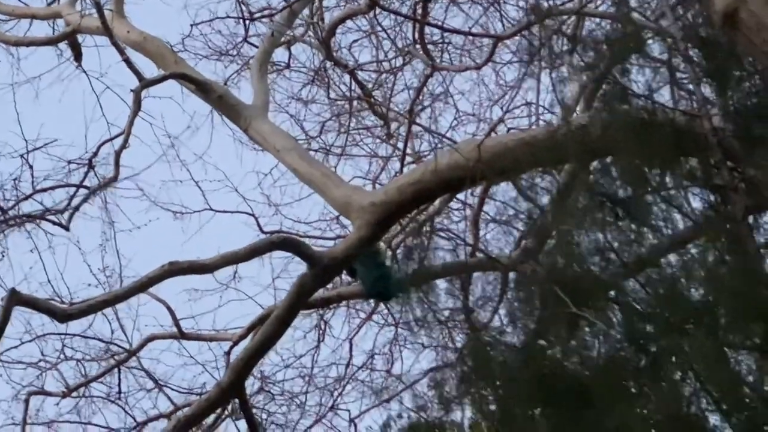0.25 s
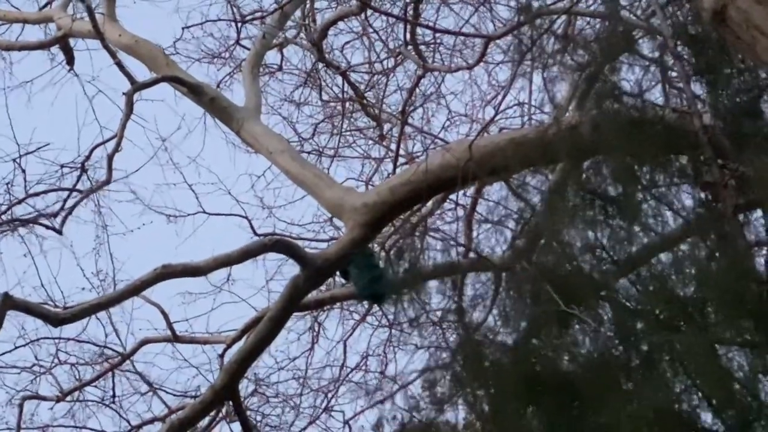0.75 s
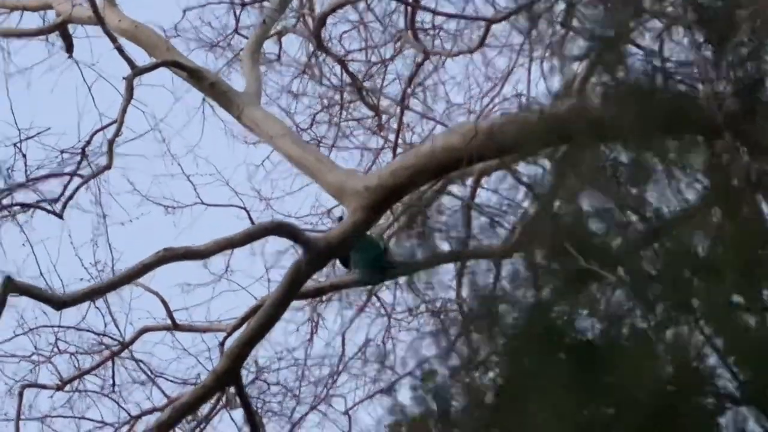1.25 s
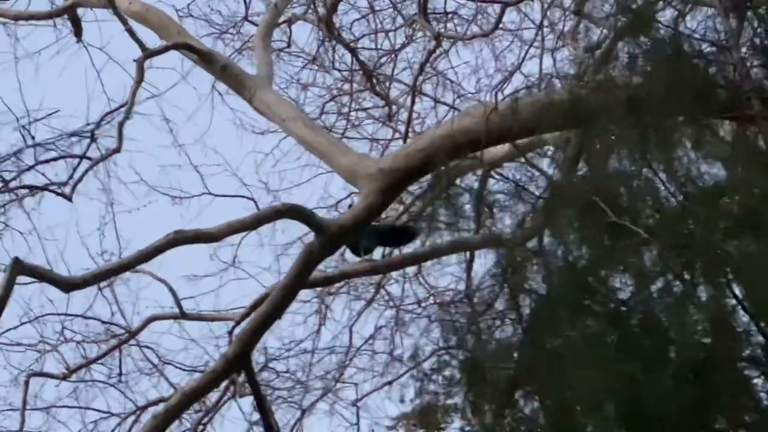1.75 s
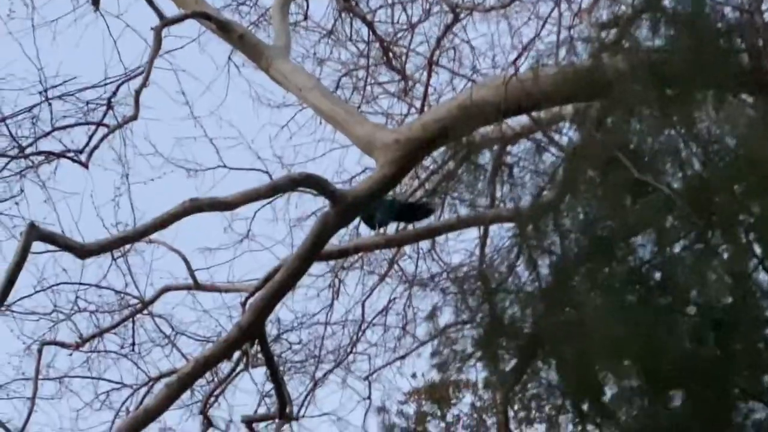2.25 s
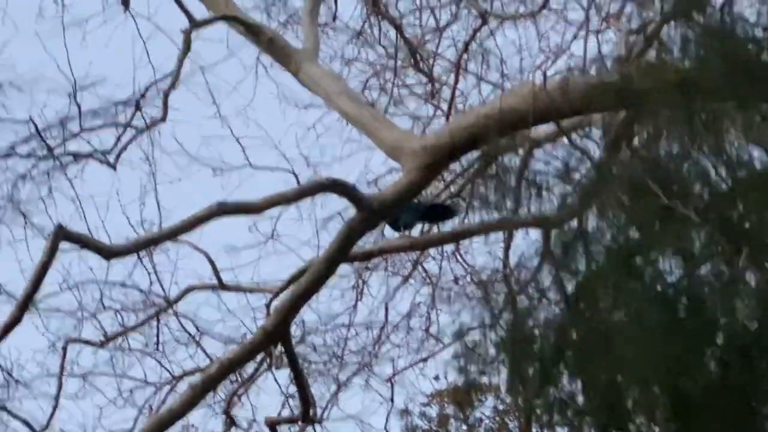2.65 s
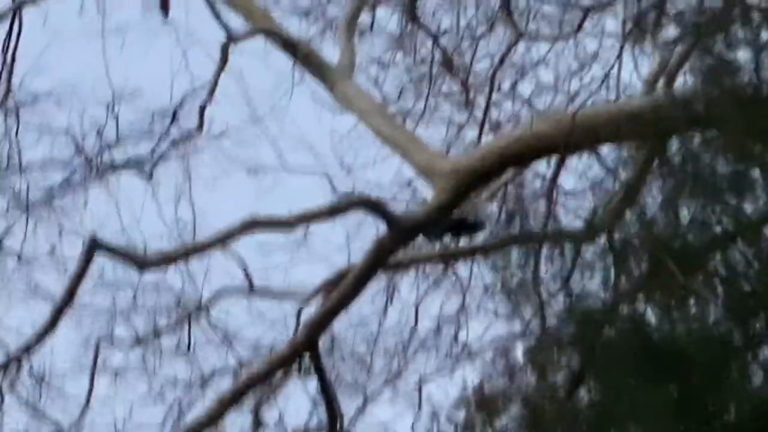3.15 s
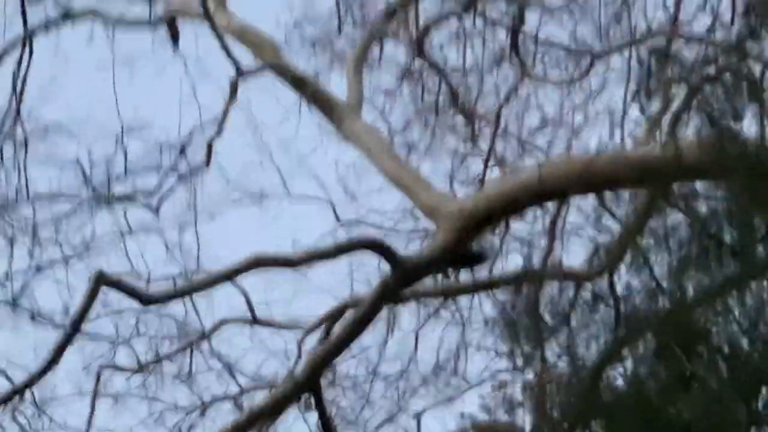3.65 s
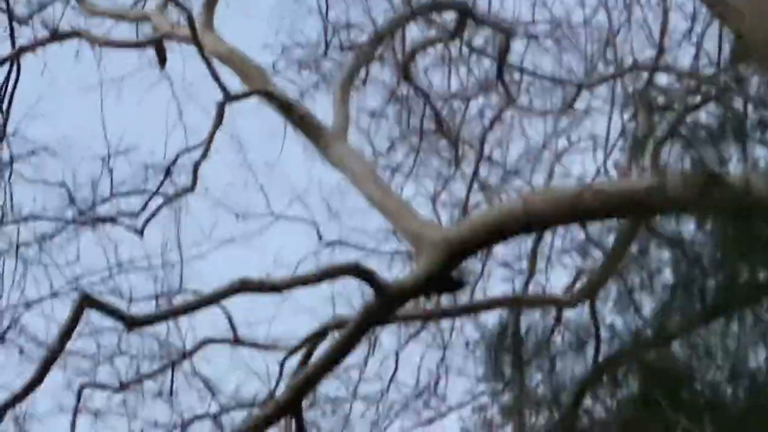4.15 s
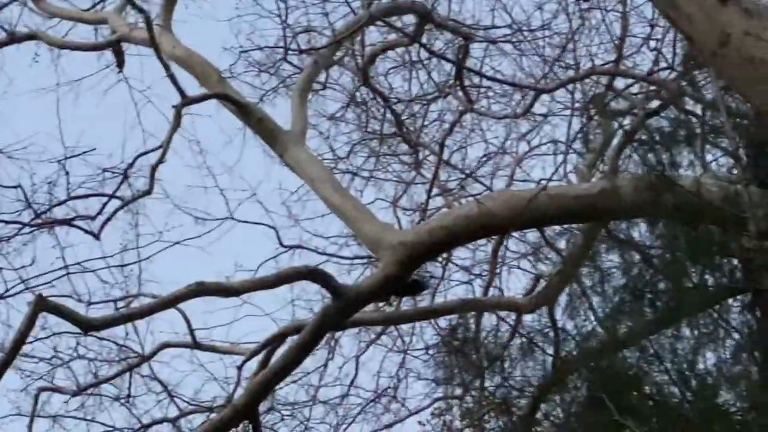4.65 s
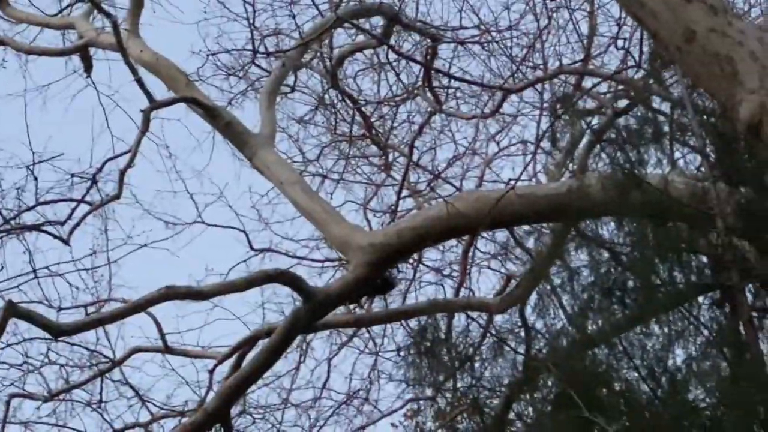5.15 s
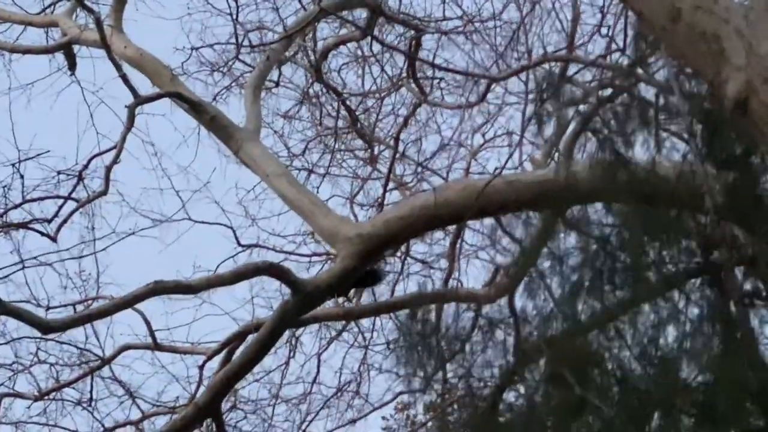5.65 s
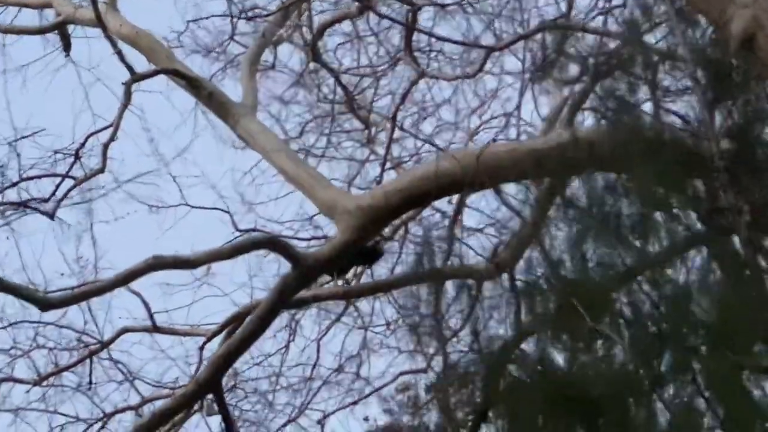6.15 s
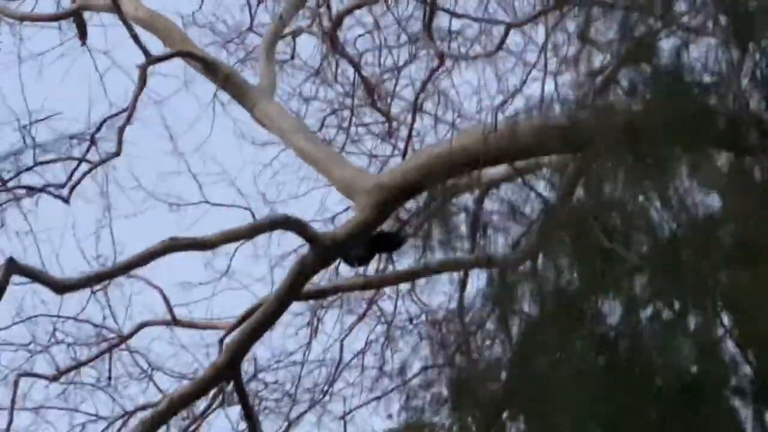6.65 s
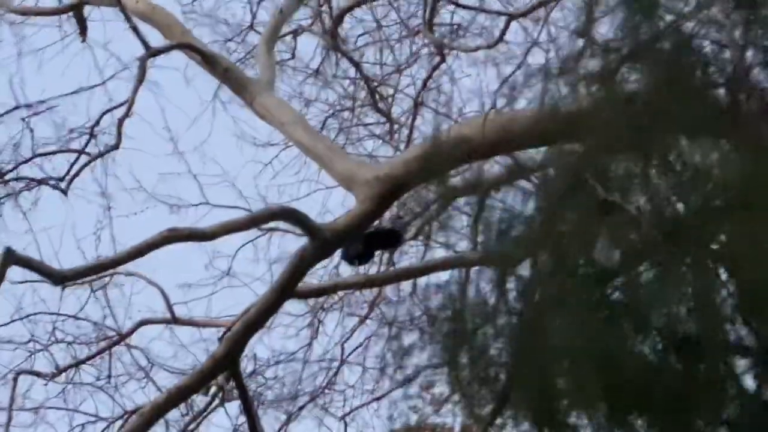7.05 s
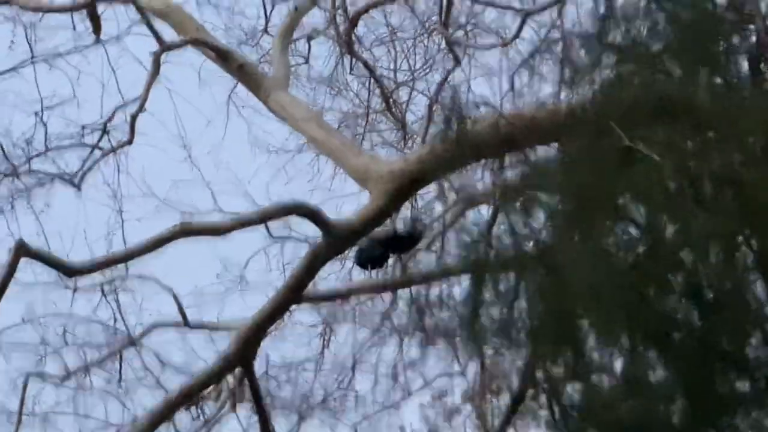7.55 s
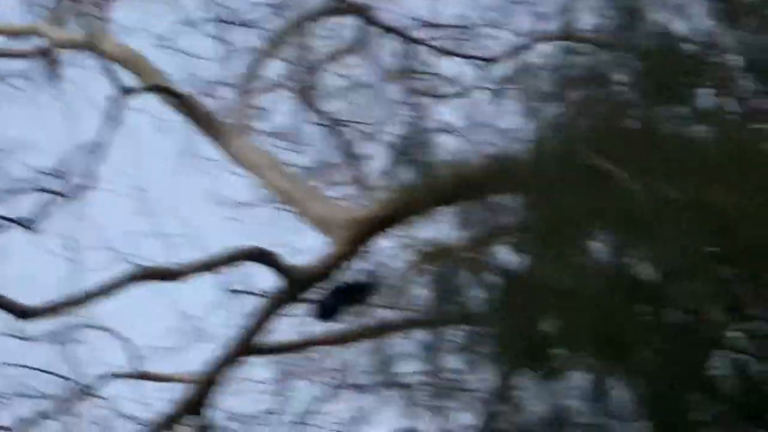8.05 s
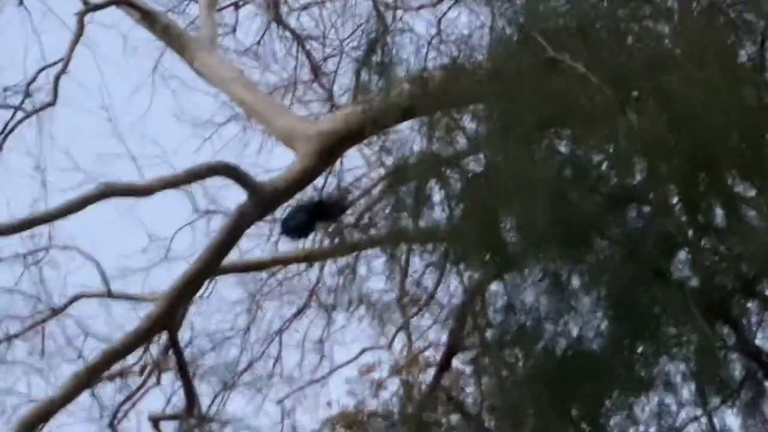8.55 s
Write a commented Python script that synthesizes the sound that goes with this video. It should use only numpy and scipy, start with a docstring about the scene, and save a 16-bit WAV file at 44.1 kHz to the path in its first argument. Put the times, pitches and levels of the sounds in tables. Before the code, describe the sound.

Outdoors among trees, a peacock calls loudly: after a quiet second, one long nasal wail sinks in pitch, then six shorter screams follow about a second apart, each breaking upward from a low note and drooping. The wood answers with brief hazy echoes. Far-off water and low rumble stay steady and faint. A hand-held camera picks up soft knocks, thumps and, near the end, rubbing and creaking.

```python
"""Peacock calling among trees

A peacock high in a tree gives one long falling wail, then six arching screams: harmonics of a gliding pitch,
shaped by a throat response. Decaying noise tails answer for the limbs, the crown and a wood's edge.
Water flows far off over a low outdoor rumble, both one coloured noise; a faint hiss precedes the wail.
Close by, fingers knock, rub and creak on a hand-held camera's case, which rings in a few damped modes."""
import sys
import numpy as np
from scipy import signal
from scipy.fft import rfft, irfft, next_fast_len
from scipy.io import wavfile
from scipy.ndimage import uniform_filter1d, map_coordinates

SR = 44100
rng = np.random.default_rng(int(sys.argv[2]) if len(sys.argv) > 2 else 0)


def dump_mix(stems):
    """Bounce the given channels to the path in sys.argv[1] as a 16-bit WAV at rate SR."""
    frames = np.atleast_2d(stems).T  # one column per channel
    limited = np.clip(frames, -1, 1)  # hard clip at full scale
    pcm = np.round(limited * 32767).astype(np.int16)
    wavfile.write(sys.argv[1], SR, pcm)


N = 388080

# Levels in the tables are relative: gains in the functions add to them.
# Distant water and rumble, spectral density: [f/Hz, level/dB per Hz]
HAZE_COLOUR = [(20, -49), (50, -2), (80, 1.5), (200, -10), (480, -8), (900, -14), (2000, -21.5),
               (2800, -28), (5700, -46.5), (7700, -59), (12000, -58.5), (15000, -67)]
# Course of the haze: [t/s, level/dB]
HAZE_LEVEL = [(0, -51), (4.498, -51), (8.8, -49)]
# Correlation of the left and right noise: [f/Hz, likeness/1]
LIKENESS = [(50, 1), (150, 0.82), (400, 0.41), (1200, 0.27), (4000, 0.96)]
# Knocks on the case: [t/s, tick level/dB, thump level/dB]
KNOCKS = [(0.898, -51, -45), (1.064, -53, -34), (1.154, -65, -32.5), (1.203, -51, -37), (1.326, -57, -33),
          (1.345, -55, -36.5), (2.016, -49.5, -46), (2.207, -52.5, -43), (2.241, -54.5, -33.5),
          (3.209, -43.5, -51), (3.606, -44, -47), (5.168, -57.5, -37), (5.621, -44.5, -50),
          (6.158, -56.5, -52), (7.463, -47, -36), (7.832, -61, -34.5), (8.181, -56, -39), (8.507, -52, -38)]
# Stick-slip creaks of the grip:
# [start t/s, end t/s, slip rate/Hz, tick level/dB, low ring level/dB, brightness/(dB per octave)]
CREAKS = [(3.156, 3.168, 230, -36.5, -50, -6.5), (8.534, 8.558, 62, -45.5, -37, 0.5),
          (8.605, 8.633, 133, -44, -31, -1), (8.638, 8.712, 59.7, -39.5, -35, 5),
          (8.757, 8.8, 108, -38, -60, 6)]
# Ringing modes of the case: [f/Hz, level/dB, t60/s]
CASE_MODES = [(623, -4.5, 0.035), (930, -1.5, 0.015), (1072, 6.5, 0.014), (2120, -0.5, 0.0063),
              (2810, -21, 0.0044)]
# Strokes of rubbing fingers: [t/s, length/s, level/dB]
RUBS = [(7, 0.12, -44), (7.241, 0.038, -47), (8.203, 0.091, -50.5), (8.53, 0.033, -53)]
# Spectral density of the rubbing: [f/Hz, level/dB per Hz]
RUB_COLOUR = [(40, -19), (120, -1), (550, -6.5), (900, -9), (1300, -16), (9000, -71)]
# Pitch of the wail: [t/s, f/Hz]
WAIL_PITCH = [(1.025, 644), (1.09, 712.6), (1.2, 718.3), (1.35, 705), (1.55, 678.4), (1.8, 649),
              (1.99, 600.5)]
# Strength of the wail: [t/s, second harmonic level/dB, overtone level/dB]
WAIL_STRENGTH = [(1.03, -50, -62), (1.088, -24.5, -45.5), (1.226, -24.5, -38), (1.336, -24.5, -44.5),
                 (1.558, -34.5, -51), (1.674, -30.5, -51.5), (1.93, -41.5, -58), (1.99, -51, -63)]
# Screams, each a low note that breaks upward into an arch:
# [start t/s, break t/s, crest t/s, end t/s, low note f/Hz, f after the break/Hz, crest f/Hz,
#  second harmonic level at the crest/dB, overtone level at the crest/dB]
SCREAMS = [(2.341, 2.524, 2.71, 3.04, 609.6, 727, 782.5, -26, -40),
           (3.381, 3.564, 3.67, 4.04, 649, 787.4, 810.7, -35.5, -34.5),
           (4.322, 4.532, 4.677, 4.93, 670, 774.4, 786, -37.5, -33.5),
           (5.221, 5.429, 5.55, 5.86, 697.6, 765, 787.4, -38.5, -33),
           (6.259, 6.459, 6.65, 6.94, 699, 765.3, 793.8, -34, -32.5),
           (7.38, 7.579, 7.78, 8.09, 694.6, 759, 797.2, -37.5, -33)]
# The fundamental grows as the pitch climbs: [f/Hz, level/dB]
FUNDAMENTAL = [(570, -49.5), (710, -38.5), (800, -33.5)]
# Throat response above the second harmonic, beak nearly closed: [f/Hz, level/dB]
NARROW_THROAT = [(1900, 12), (2075, -13.5), (2135, 9.5), (2850, -5.5), (3130, -13), (3550, -5),
                 (4300, -10.5), (6400, -14.5), (7800, -21.5), (9000, -25), (11000, -27), (12500, -34.5),
                 (15500, -50)]
# The same with the beak wide open: [f/Hz, level/dB]
OPEN_THROAT = [(1750, 7), (2050, 2.5), (2380, 3), (2600, -6.5), (2950, -1.5), (3250, -12.5), (3900, -16.5),
               (4700, -18.5), (7200, -24.5), (8600, -32.5), (11500, -34.5), (13200, -37), (15500, -49)]
# Decay time of the wood's answer: [f/Hz, t60/s]
WOOD_DECAY = [(600, 0.33), (2200, 0.84), (4000, 0.96), (15000, 0.062)]
# Phase difference of the bird's sound, left against right: [f/Hz, phase/rad]
PHASE_DIFFERENCE = [(1900, 0.5), (3000, 0.43), (5000, 0.58), (6000, -0.5), (7800, -0.1), (8200, 2),
                    (9000, 1.5), (13300, -2.5)]

TOP_HZ = 15800  # band limit
# light fidgeting: the firmest touch, and how much softer the lightest is
TOUCHES_PER_S = 2.5
TOUCH_TICK_DB, TOUCH_THUMP_DB, TOUCH_RANGE_DB = -55, -42, 12
# a scream starts this share of the way from the resting pitch to its low note
REST_HZ, START_SHARE = 538, .33
# the low note tops out and bends before the break; the leap ends after it
LOW_NOTE_S, SAG_S, LEAP_S = .075, 0.0348, .025
# a wider leap follows a sag of this share of the excess, a narrower one a rise
SMOOTH_LEAP_HZ, SAG_SHARE = 81.9, 0.432
# the pitch sinks gently for this share of the fall, then steeply
SHOULDER_SHARE, SHOULDER_HZ, FALL_HZ = .46, 41.93, 174.4
# all screams are alike where the voice is slack
SLACK_HZ, SLACK_SECOND_DB, SLACK_OVERTONE_DB = 649, -42, -38.5
# the overtones start this far down and catch up with this time constant
ATTACK_DB, ATTACK_S = 17.5, 0.039


def amp(db):
    """Logarithmic level: decibels to amplitude gain."""
    return 10 ** (np.asarray(db) / 20)


def unit(x):
    """Normalisation: scale to rms 1."""
    return x / np.sqrt(np.mean(x ** 2) + 1e-20)


def along(points, hz):
    """Logarithmic frequency axis: (f/Hz, value) points interpolated at hz."""
    f, v = np.transpose(points)
    return np.interp(np.log(hz + 1), np.log(f + 1), v)


def wobble(rate, size):
    """Band-limited randomness: a smooth random curve with rate knots a second."""
    knots = rng.standard_normal(int(size * rate / SR) + 4)
    return map_coordinates(knots, [np.arange(size) * rate / SR])


def glide(points, t):
    """Monotone cubic interpolation: a rounded curve through (t/s, value) points, level at each turn."""
    s, v = np.transpose(points)
    span = np.diff(s)
    step = np.diff(v) / span
    inner = 2 * np.maximum(step[:-1] * step[1:], 0) / (step[:-1] + step[1:] + 1e-9)
    slope = np.r_[step[0], inner, step[-1]]
    i = np.clip(np.searchsorted(s, t) - 1, 0, len(span) - 1)
    u = (t - s[i]) / span[i]
    bend = (1 - u) * (slope[i] - step[i]) - u * (slope[i + 1] - step[i])
    return v[i] + span[i] * u * (step[i] + (1 - u) * bend)


def filtered(x, response):
    """Linear filtering: the spectrum of x times a response of frequency."""
    m = next_fast_len(N + SR // 2)
    return irfft(rfft(x, m) * response(np.fft.rfftfreq(m, 1 / SR)), m)[..., :N]


def add(track, s, sound):
    """Superposition: mix a sound into the track at time s."""
    room = track[..., round(s * SR):][..., :sound.shape[-1]]
    room += sound[..., :room.shape[-1]]


def rush(spectrum, patchy_db):
    """Coloured noise: a partly correlated stereo pair of rms 1, with random gain over time and frequency."""
    z = signal.stft(rng.standard_normal((2, N)), nperseg=512)[2]
    field = uniform_filter1d(rng.standard_normal(z.shape[1:]), size=5, axis=0)
    field = uniform_filter1d(field, size=12, axis=1)
    pair = signal.istft(z * amp(patchy_db * unit(field)), nperseg=512)[1][:, :N]

    def mid_side_response(hz):
        # the likeness of left and right sets the share of mid and side
        turn = np.arccos(np.clip(along(LIKENESS, hz), -1, 1)) / 2
        return amp(along(spectrum, hz)) * np.array([np.cos(turn), np.sin(turn)])

    mid, side = filtered(pair, mid_side_response)
    return unit(np.array([mid + side, mid - side]))


def haze():
    """Broadband noise: distant water and a low rumble merge into one steady, patchy spectrum."""
    level_db = np.interp(np.arange(N) / SR, *np.transpose(HAZE_LEVEL))
    return amp(level_db) * rush(HAZE_COLOUR, patchy_db=1.5)


def touches():
    """Random contacts: light finger touches at uniformly random moments, in rows like the knocks."""
    when, tick, thump = rng.random((round(TOUCHES_PER_S * N / SR), 3)).T
    tick_db = TOUCH_TICK_DB - TOUCH_RANGE_DB * tick
    thump_db = TOUCH_THUMP_DB - TOUCH_RANGE_DB * thump
    return list(zip(when * N / SR, tick_db, thump_db))


def case_tick(t, bright_db):
    """Modal excitation: a tiny crack sets off damped modes; hard contacts favour the high ones (dB an octave)."""
    ring = 0
    for hz, db, t60 in CASE_MODES:
        level = db + bright_db * np.log2(hz / 1000) + rng.normal(0, 2)
        ring = ring + amp(level - 60 * t / t60) * np.sin(2 * np.pi * hz * rng.normal(1, 0.07) * t)
    crack = amp(-13.5 + 2.7 * bright_db - 60 * t / 0.0032) * rng.standard_normal(len(t))
    return ring + crack


def fingertip_thump(t, thump_hz, thump_t60):
    """Damped oscillation: the fingertip's soft push swells after the tick and sinks in pitch."""
    cycles = np.cumsum(thump_hz * rng.normal(1, 0.11) * (1 + 5 * np.exp(-t / 0.00407))) / SR
    return np.sin(2 * np.pi * cycles) * amp(-60 * t / thump_t60) * (1 - np.exp(-t / 0.041))


def hollow_ring(t, ring_hz, ring_t60):
    """Damped resonance: one low hollow tone, its pitch different at each contact."""
    return np.sin(2 * np.pi * ring_hz * rng.normal(1, 0.13) * t) * amp(-60 * t / ring_t60)


def rubbing():
    """Friction noise: coloured noise under bell-shaped strokes of the fingers."""
    clock = np.arange(N) / SR
    stroke = sum(amp(db) * np.exp(-2 * ((clock - s) / length) ** 2) for s, length, db in RUBS)
    return stroke * amp(3 * wobble(90, N)) * rush(RUB_COLOUR, patchy_db=2.5)


def handling(tick_db, thump_db, thump_hz, thump_t60, ring_hz, ring_t60, hollow_db):
    """Impact and stick-slip: fingers knock on the case, stick and slip on it, and rub across it."""
    track, t = np.zeros(N), np.arange(SR // 8) / SR
    for s, db, low_db in KNOCKS + touches():
        thump = amp(thump_db) * fingertip_thump(t, thump_hz, thump_t60)
        low = thump + amp(hollow_db) * hollow_ring(t, ring_hz, ring_t60)
        add(track, s, amp(db + tick_db) * case_tick(t, bright_db=-5.0) + amp(low_db) * low)
    for start, end, rate, db, low_db, bright_db in CREAKS:
        for s in np.arange(start, end, 1 / rate):
            slip = amp(db) * case_tick(t, bright_db) + amp(low_db) * hollow_ring(t, ring_hz, ring_t60)
            add(track, s + rng.normal(0, 0.00032), slip)
    return track + rubbing()


def hiss(start, hz, db, t60):
    """Exponential decay: a faint high hiss comes up shortly before the wail and dies away."""
    age = np.maximum(np.arange(N) / SR - start, 0)
    colour = [(hz / 2, -12), (hz, 0), (TOP_HZ, -22)]
    envelope = amp(db - 60 * age / t60) * (1 - np.exp(-age / .01)) * (age > 0)
    return envelope * rush(colour, patchy_db=-2.5)


def croak(length, tone_hz, pulse_hz, db):
    """Amplitude modulation: a weak pulsing note while the syrinx starts to swing."""
    t = np.arange(0, length, 1 / SR)
    pulse_rate = pulse_hz * (1 + 0.28 * wobble(31, len(t)))
    pulses = np.sin(np.pi * np.cumsum(pulse_rate) / SR) ** 2
    swell = np.sqrt(np.abs(np.sin(np.pi * t / length)))
    return amp(db) * swell * pulses * np.sin(2 * np.pi * tone_hz * t + wobble(60, len(t)))


def wail():
    """Prescribed contours: times, pitch and harmonic levels of the long falling wail."""
    t = np.arange(WAIL_PITCH[0][0], WAIL_PITCH[-1][0], 1 / SR)
    times, second_db, upper_db = np.transpose(WAIL_STRENGTH)
    return t, glide(WAIL_PITCH, t), np.interp(t, times, second_db), np.interp(t, times, upper_db)


def scream(start, leap, crest, end, low_hz, high_hz, crest_hz, crest_second_db, crest_overtone_db):
    """Common control: harmonic levels follow the pitch from a shared slack level to the scream's crest level."""
    t = np.arange(start, end, 1 / SR)
    pitch = glide([(start, REST_HZ + START_SHARE * (low_hz - REST_HZ)),
                   (leap - LOW_NOTE_S, low_hz),
                   (leap - SAG_S, low_hz - SAG_SHARE * (high_hz - low_hz - SMOOTH_LEAP_HZ)),
                   (leap + LEAP_S, high_hz),
                   (crest, crest_hz),
                   (crest + SHOULDER_SHARE * (end - crest), crest_hz - SHOULDER_HZ),
                   (end, crest_hz - FALL_HZ)], t)
    effort = (pitch - SLACK_HZ) / (crest_hz - SLACK_HZ)
    second_db = SLACK_SECOND_DB + effort * (crest_second_db - SLACK_SECOND_DB)
    upper_db = SLACK_OVERTONE_DB + effort * (crest_overtone_db - SLACK_OVERTONE_DB)
    return t, pitch, second_db, upper_db - ATTACK_DB * np.exp((start - t) / ATTACK_S)


def call(t, pitch, second_db, upper_db, jitter, rasp, shimmer_db, beat_depth, dull_db, body_db, fading_db,
         second_gain_db, overtone_db):
    """Source and filter: the syrinx's harmonics pass the throat, cleanest at the top pitch, rough when slack."""
    size = len(t)
    slack = np.clip((pitch.max() - pitch) / 140, 0, 1)
    sinking = slack * (t > t[np.argmax(pitch)])
    breaking = np.clip(np.gradient(pitch) * SR / 2500, 0, 1) ** 2
    unsteady = jitter * ((0.39 + slack) * wobble(170, size) + 0.2 * wobble(900, size))
    phase = 2 * np.pi * np.cumsum(pitch * (1 + unsteady)) / SR
    k = np.arange(1, 25)[:, None]  # harmonic numbers
    upper_k = k[2:]

    # a nearly closed beak favours the second harmonic and reshapes the overtones
    narrow = np.clip((second_db - upper_db) / 17, 0, 1)
    throat_db = narrow * along(NARROW_THROAT, upper_k * pitch)
    throat_db = throat_db + (1 - narrow) * along(OPEN_THROAT, upper_k * pitch)
    # slackness tilts the overtones by dull_db an octave: duller if positive, brighter if negative
    overtones = amp(throat_db - dull_db * slack * np.log2(upper_k))
    overtones *= amp(upper_db + overtone_db) / np.linalg.norm(overtones, axis=0)
    fundamental = amp(along(FUNDAMENTAL, pitch) + body_db - fading_db * sinking)
    sizes = np.vstack([fundamental, amp(second_db + second_gain_db), overtones])

    # strength wavers more in higher harmonics, up to the fifth
    waver = np.array([wobble(35.12, size) + 0.41 * wobble(8.97, size) for _ in k])
    sizes *= amp(shimmer_db * np.minimum(k / 5, 1) ** 2 * waver)
    partials = np.sqrt(2) * sizes * np.sin(k * phase + rng.uniform(0, 2 * np.pi, k.shape))

    # where the voice is slack, breaks upward or sinks, the overtones scatter into noise
    chaos = rasp * (slack + sinking ** 2) + .6 * breaking
    scatter = np.array([wobble(750, size) for _ in upper_k])
    partials[2:] *= (1 + chaos * scatter) / np.hypot(1, chaos)
    # as the pitch sinks the level beats, as where echoes overlap the gliding call, the fundamental least
    beat = np.sin(2 * np.pi * np.cumsum(46 + 6 * wobble(22.73, size)) / SR)
    partials *= 1 + beat_depth * np.minimum(k / 2, 1) * np.sqrt(sinking) * beat
    fade = np.clip(np.minimum((t - t[0]) / 0.018, (t[-1] - t) / 0.034), 0, 1)
    return partials.sum(axis=0) * fade


def peacock():
    """Voiced sound: a croak leads into the wail, and the screams follow."""
    track = np.zeros(N)
    add(track, .92, croak(length=0.25, tone_hz=673, pulse_hz=57.0, db=-41))
    cry = call(*wail(), jitter=0.01, rasp=0.66, shimmer_db=3.0, beat_depth=0.88, dull_db=-1, body_db=0.5,
               fading_db=7.0, second_gain_db=0, overtone_db=-4.0)
    add(track, WAIL_PITCH[0][0], cry)
    for row in SCREAMS:
        cry = call(*scream(*row), jitter=0.0035, rasp=0.017, shimmer_db=4.0, beat_depth=0.36, dull_db=4.5,
                   body_db=-1.0, fading_db=1.5, second_gain_db=-0.5, overtone_db=-2.0)
        add(track, row[0], cry)
    return track


def trees(x, near_db, far_db, near_t60, crown_db, crown_t60, width, limb_hz, dull_hz):
    """Scattering: nearby limbs and the crown return the treble at once, the wood behind a long, duller tail."""
    hz, t, z = signal.stft(rng.standard_normal((2, SR)), SR, nperseg=256)
    decay = amp(-60 * t / along(WOOD_DECAY, hz)[:, None]) * (1 - np.exp(-t / 0.0037))
    far = signal.istft(z * decay, SR, nperseg=256)[1]
    t = np.arange(far.shape[1]) / SR
    limbs_and_crown = amp(-60 * t / near_t60) + amp(crown_db - 60 * t / crown_t60)
    near = rng.standard_normal(far.shape) * limbs_and_crown * (t > .002)

    def answer(tail):
        return signal.fftconvolve(x[None], tail / np.linalg.norm(tail[0]), axes=1)[:, :N]

    # thin limbs throw back short waves only; foliage swallows them on the long way round
    scatter = filtered(answer(near), lambda hz: hz ** 3 / (hz ** 3 + limb_hz ** 3))
    distant = filtered(answer(far), lambda hz: 1 / np.hypot(1, (hz / dull_hz) ** 3))
    mid, side = amp(near_db) * scatter + amp(far_db) * distant
    return np.array([mid + width * side, mid - width * side])


def stereo_phase(pair):
    """Stereo phase: left and right differ by a phase that varies with frequency."""
    half_turn = .5j * np.array([[1], [-1]])
    return filtered(pair, lambda hz: np.exp(half_turn * along(PHASE_DIFFERENCE, hz)))


def scene():
    """Superposition of sources: the bird straight ahead among the trees, the hand, the haze and the hiss."""
    bird = peacock()
    echoes = trees(bird, near_db=5, far_db=-10.5, near_t60=0.24, crown_db=2.0, crown_t60=0.35,
                   width=0.25, limb_hz=2590, dull_hz=3130)
    hand = handling(tick_db=9.5, thump_db=13.0, thump_hz=83.0, thump_t60=0.11,
                    ring_hz=324, ring_t60=0.037, hollow_db=-2.0)
    # soft skin takes the edge off every contact, and the hand lies nearer the left
    hand = filtered(hand, lambda hz: 1 / (1 + (hz / 5000) ** 2)) * amp([[1], [-1]])
    return stereo_phase(bird + echoes) + hand + haze() + hiss(start=.655, hz=7500, db=-71.5, t60=2.4)


def record(dry):
    """Band limitation: the camera keeps nothing above its band limit."""
    return filtered(dry, lambda hz: hz < TOP_HZ)


dry = scene()
out = record(dry)
dump_mix(out)
```